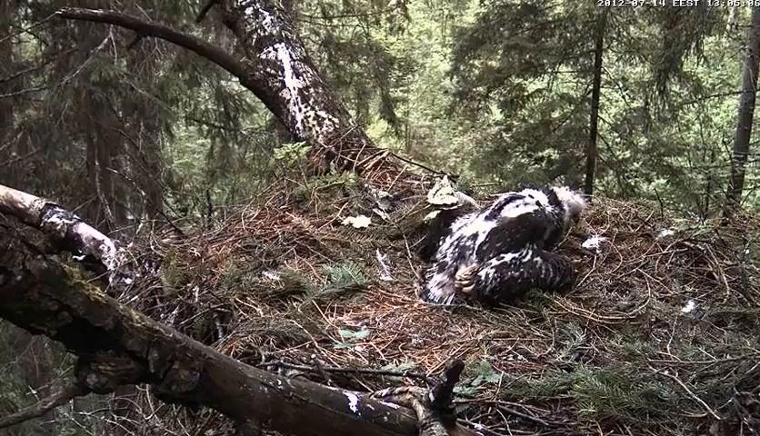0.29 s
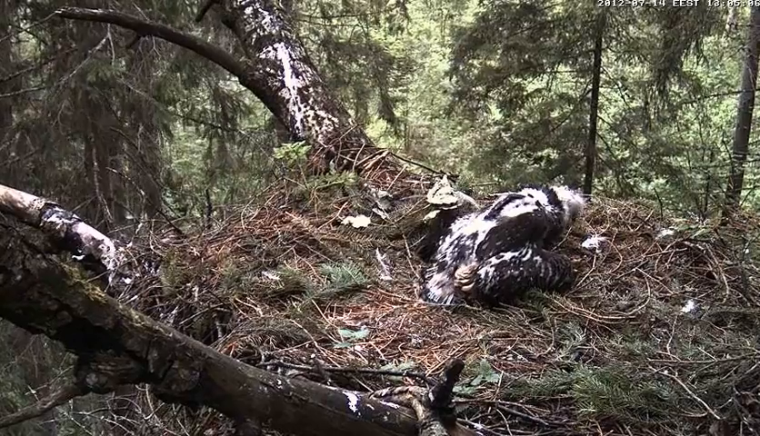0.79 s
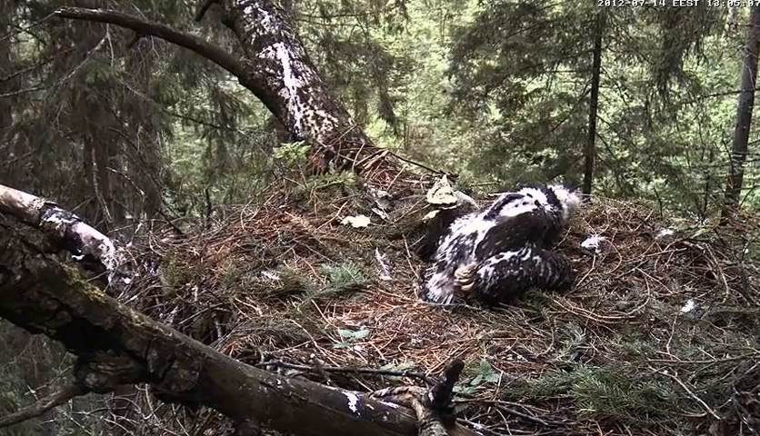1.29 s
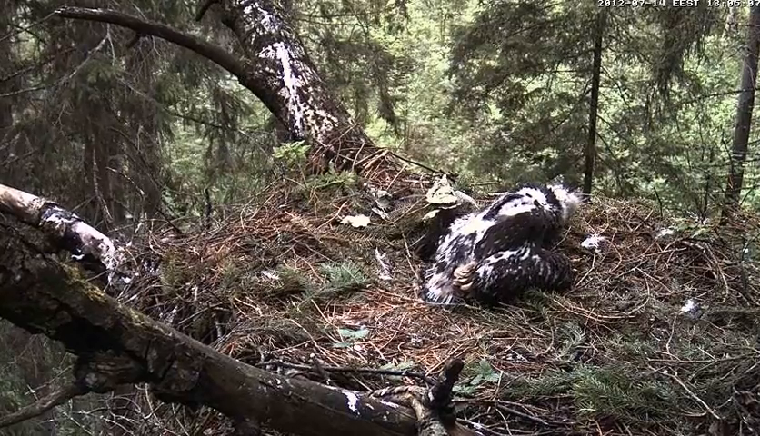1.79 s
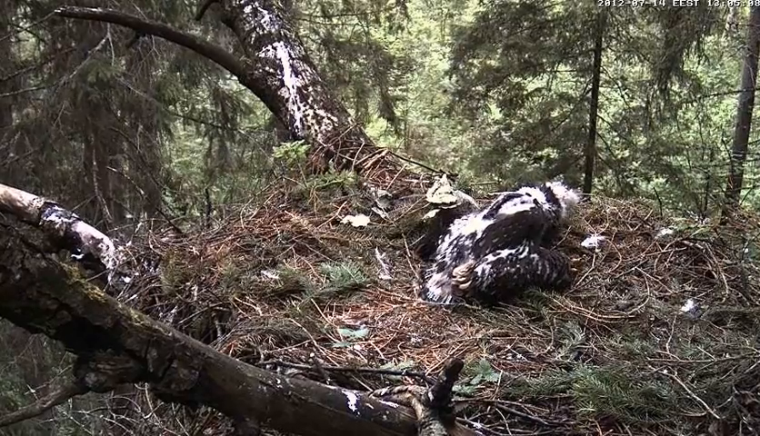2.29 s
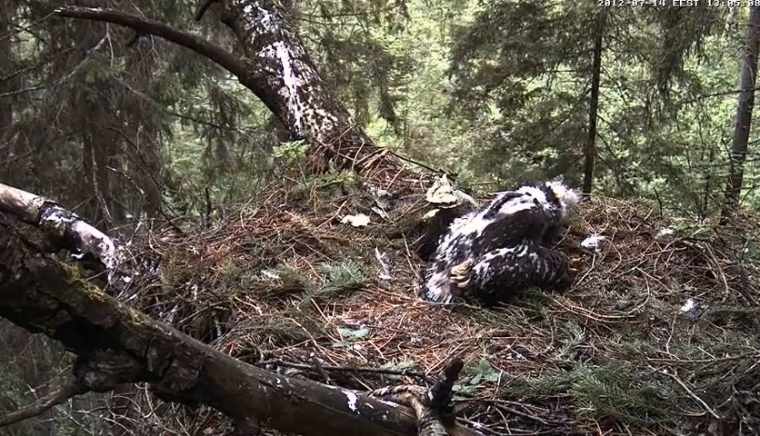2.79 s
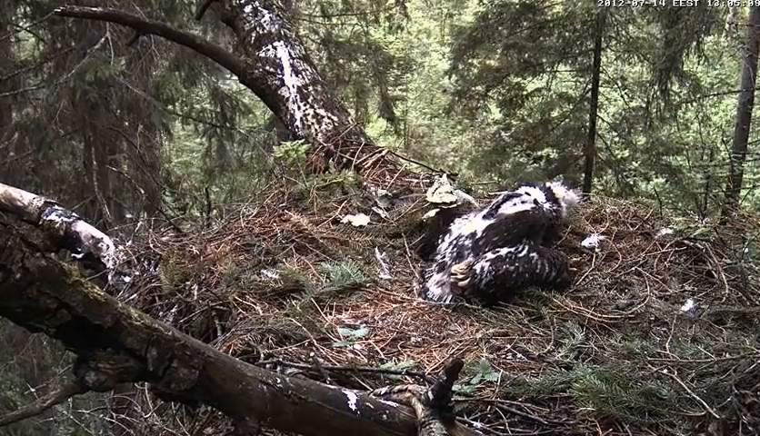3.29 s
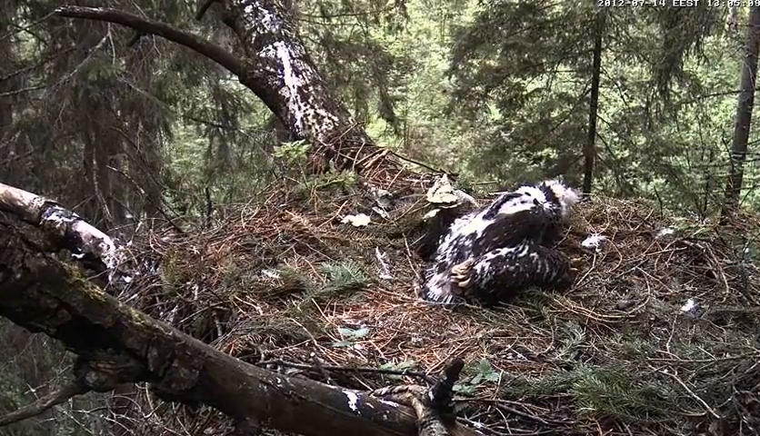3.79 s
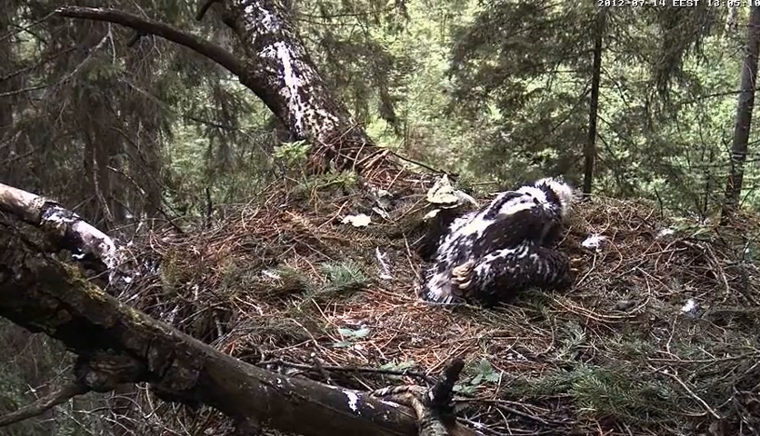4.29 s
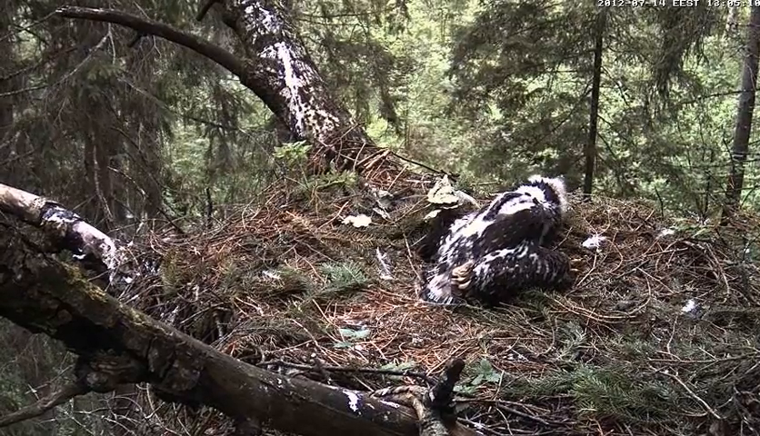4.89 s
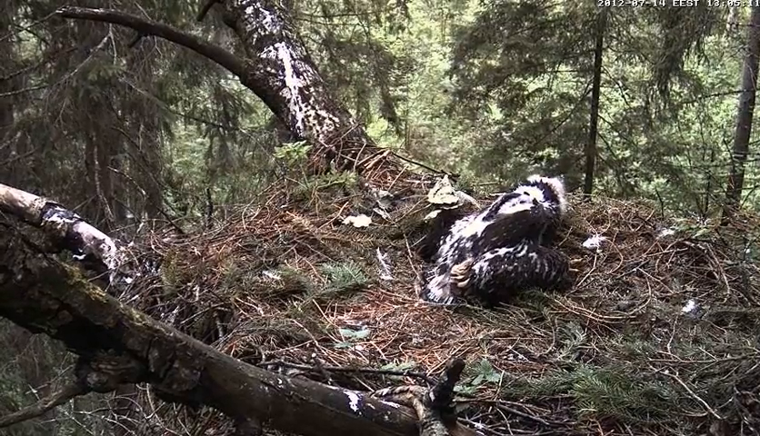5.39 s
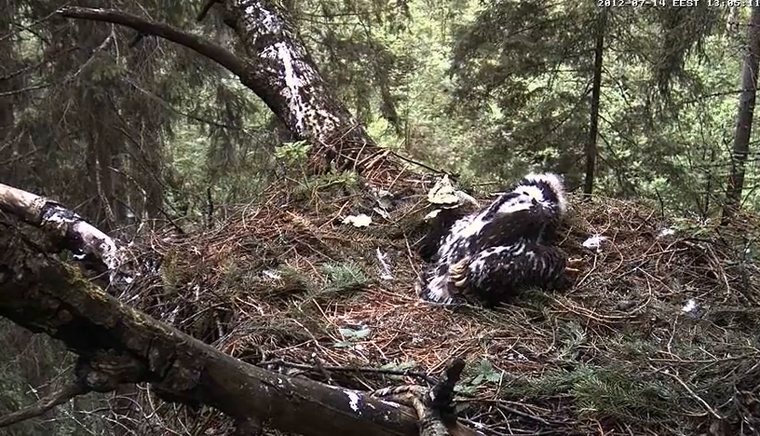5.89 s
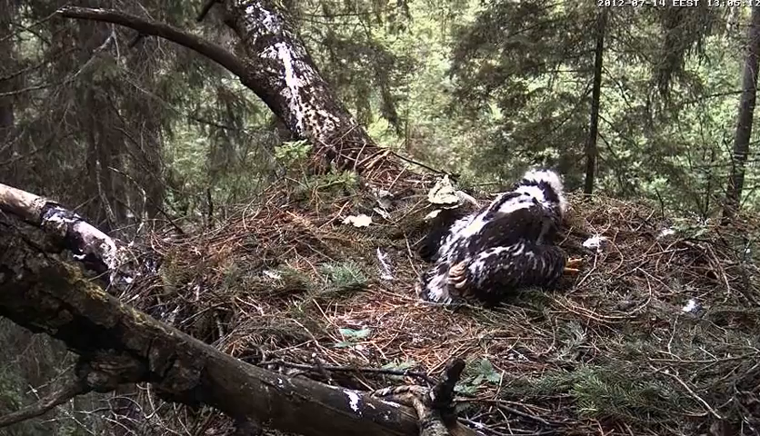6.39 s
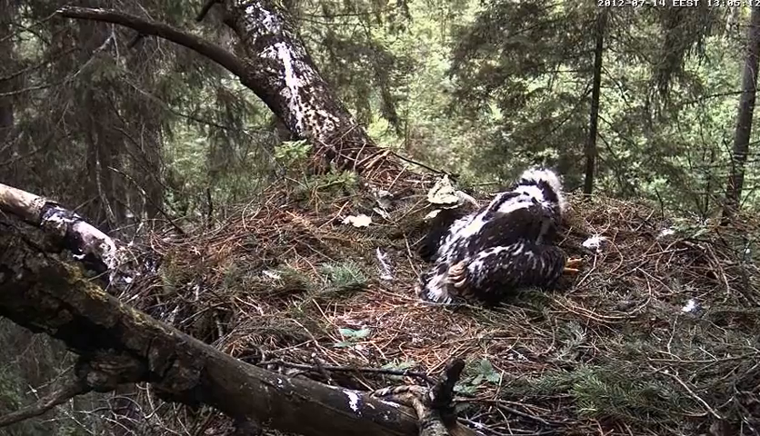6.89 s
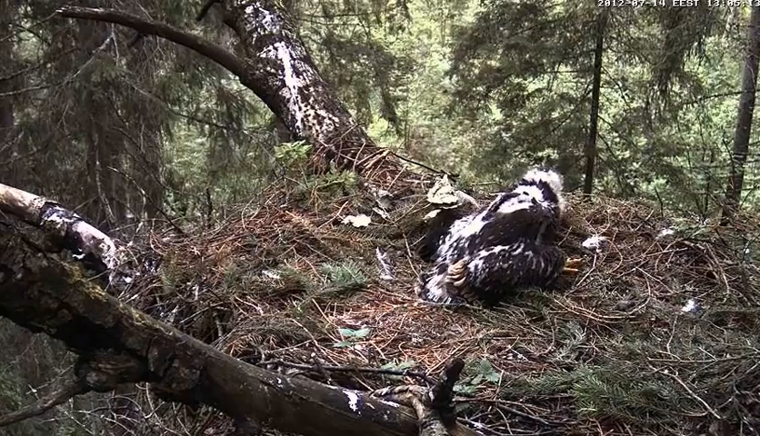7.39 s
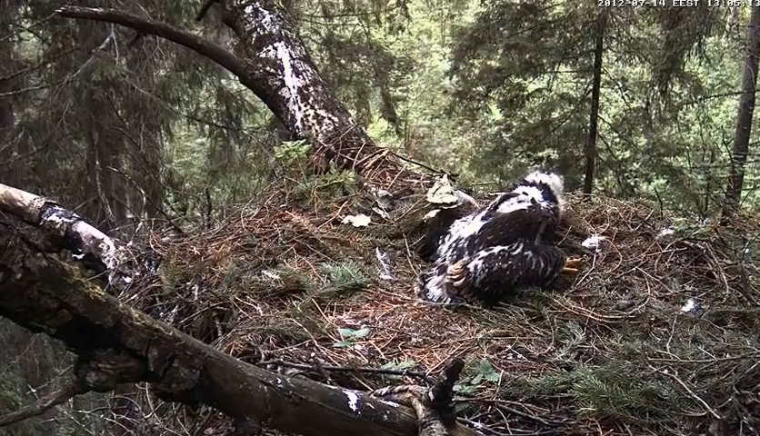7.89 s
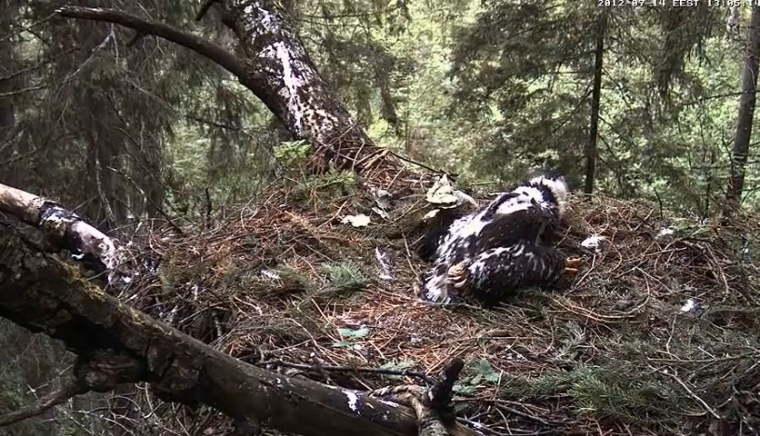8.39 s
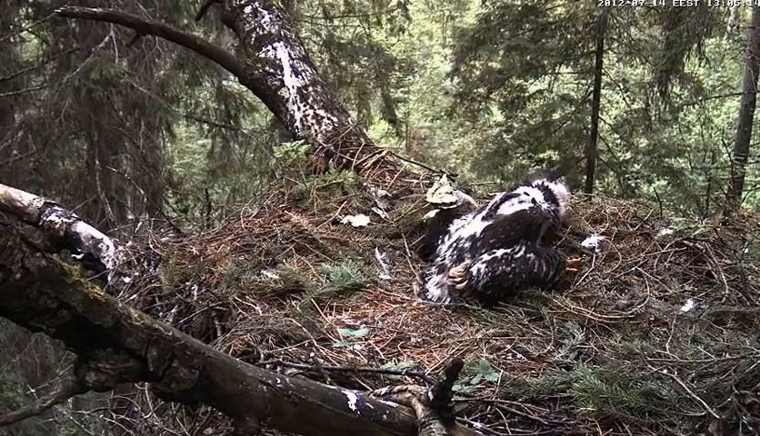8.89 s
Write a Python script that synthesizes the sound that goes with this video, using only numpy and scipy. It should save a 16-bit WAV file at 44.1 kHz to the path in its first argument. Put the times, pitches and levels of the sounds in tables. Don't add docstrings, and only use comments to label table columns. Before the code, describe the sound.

In a forest nest, one chick repeats a clipped, slightly hoarse two-step whistle, high then suddenly low, at an even insistent pace. Small puffs of breath and very faint rising squeaks fill some gaps. A quiet, dull hiss of wind swells and sinks behind, and each cry leaves a faint tail among the trees. The close nest microphone is lo-fi, with a gritty edge on peaks.

```python
import sys
import numpy as np
from scipy import signal
from scipy.fft import rfft, irfft, next_fast_len
from scipy.io import wavfile
from scipy.ndimage import uniform_filter1d

SR = 44100
rng = np.random.default_rng(int(sys.argv[2]) if len(sys.argv) > 2 else 0)


def pcm_store(signal):
    levels = np.round(np.clip(np.atleast_2d(signal), -1, 1) * 32767)
    wavfile.write(sys.argv[1], SR, levels.astype(np.int16).T)


def gain_from_db(level_db):
    decades = np.asarray(level_db, float) / 20
    return 10 ** decades


N = 401310

# (voice onset t/s, swell/s, start f/Hz, end f/Hz, level/dB)
HIGH_NOTES = [(.464, 0.011, 2728, 2579, -25.5), (1.110, 0.026, 2773, 2590, -25.5),
              (1.775, .008, 2713, 2570, -30), (2.402, .022, 2711, 2576, -28),
              (3.143, 0.043, 2792, 2617, -25.5), (3.794, 0.0053, 2704, 2582, -28.5),
              (4.441, 0.012, 2740, 2620, -25.5), (5.099, 0.014, 3034, 2928, -27.5),
              (5.803, 0.015, 3050, 2818, -26), (6.485, 0.014, 2782, 2558, -24),
              (7.137, 0.021, 2830, 2548, -24), (7.815, 0.043, 2830, 2454, -24),
              (8.452, 0.084, 2967, 2614, -22), (9.095, 0.008, 2900, 2674, -24.5)]
# (against high note/dB, against low note/dB, rush of air before the voice/dB)
BREATHINESS = [(-13, -21, -45), (-10.5, -25.5, -48), (-6.5, -26, -59.5), (-10, -24.5, -46), (-12, -26, -53),
               (-7.5, -30.5, -47.5), (-11.5, -20, -47.5), (-23.5, -14, -67), (-19.5, -18, -53.5),
               (-15, -24.5, -43), (-16.5, -23.5, -45), (-17, -31.5, -50), (-19.5, -16.5, -50),
               (-6.5, -19, -47.5)]
GLIDE_S = .032
CATCH_S = 0.0046
RELEASE_S = .018


def rms_one(x):
    return x / np.sqrt(np.mean(x ** 2) + 1e-20)


def colour(x, points):
    hz, db = np.transpose(points)
    size = next_fast_len(N + 4096)
    grid = np.log(np.arange(size // 2 + 1) * SR / size + 1)
    gain = gain_from_db(np.interp(grid, np.log(hz), db))
    padded = np.pad(x, 2048, "reflect")
    return irfft(rfft(padded, size) * gain, size)[2048:2048 + N]


def drift(rate_hz):
    low = signal.butter(2, rate_hz, fs=SR, output="sos")
    return rms_one(signal.sosfilt(low, rng.standard_normal(N + SR))[SR:])


def breath(modes):
    air, out = rng.standard_normal(N), 0
    for k, (hz, width, db) in enumerate(modes):
        r = np.exp(-np.pi * width / SR)
        ring = [1, -2 * r * np.cos(2 * np.pi * hz / SR), r * r]
        once = signal.lfilter([1, 0, -1], ring, air)
        twice = signal.lfilter([1, 0, -1], ring, once)
        out = out + (-1) ** k * gain_from_db(db) * rms_one(twice)
    return rms_one(out)


def hump(start, length):
    at = np.arange(int(start * SR), int((start + length) * SR))
    return at, np.sin(np.linspace(0, np.pi, len(at)))


def wind(patchy_db=0.99):
    # (t/s, level/dB)
    gusts = [
        (0.0, -46.5),
        (1.77, -47.5),
        (1.929, -49.5),
        (4.328, -47.5),
        (6.41, -47.5),
        (6.82, -50),
        (8.72, -50),
        (9.1, -49),
    ]
    # (f/Hz, level per Hz/dB)
    hiss = [(82, -74), (140, -50.5), (207, -23), (297, -8.5), (341, -5), (376, -2.5), (483, -0.5),
            (620, -4.5), (879, -14.5), (1230, -13.5), (1450, -10), (1670, -12.5), (1860, -9.5),
            (2360, -15.5), (3490, -21.5), (3900, -33.5), (5070, -65), (8580, -120)]
    s, db = np.transpose(gusts)
    level = gain_from_db(np.interp(np.arange(N) / SR, s, db) + patchy_db * drift(4.7))
    return level * rms_one(colour(rng.standard_normal(N), hiss))


def squeaks():
    out = np.zeros(N)
    # (t/s, length/s, start f/Hz, end f/Hz, level/dB)
    whistles = [
        (.275, 0.022, 3600, 3690, -62.5),
        (3.57, 0.054, 3300, 3510, -58.5),
        (4.225, 0.067, 3120, 3400, -57),
        (5.605, 0.018, 3400, 3900, -60.5),
        (7.655, 0.027, 3480, 3600, -66),
        (8.905, 0.028, 3620, 3730, -66),
    ]
    for s, length, from_hz, to_hz, db in whistles:
        at, shape = hump(s, length)
        phase = 2 * np.pi * np.cumsum(np.linspace(from_hz, to_hz, len(at))) / SR
        out[at] = gain_from_db(db) * np.sqrt(2 * np.abs(shape)) * np.sin(phase)
    return out


def glide_start(onset):
    # (voice onset t/s, murmur/s)
    murmurs = [
        (1.775, .024),
        (3.143, 0.013),
    ]
    murmur = [length for s, length in murmurs if abs(s - onset) < .02]
    return onset - GLIDE_S - max(murmur + [CATCH_S])


def rushes(length=0.043):
    # (f/Hz, width/Hz, level/dB)
    rush_modes = [(2100, 500, -1.5), (2900, 530, 3.5), (3470, 450, -8.5)]
    gain = np.zeros(N + SR)
    for high, (_, _, rush_db) in zip(HIGH_NOTES, BREATHINESS):
        at, shape = hump(glide_start(high[0]), length)
        gain[at] = gain_from_db(rush_db) * shape
    return gain[:N] * breath(rush_modes)


def contour(now, high, low, rush_db):
    # (t/s, drop/Hz, louder/dB)
    slips = [
        (5.1367, 149.9, 3.5),
        (5.843, 86.2, 4.5),
    ]
    glide_from_hz, glide_under_rush_db, glide_end_db = 3900, 11.5, -47
    catch_hz, catch_follows, catch_db = 3115, 0.51, -38.5
    quick_settle_hz, settle_s_per_hz, murmur_slows = 2679, 5e-5, .25
    high_fade_db, low_fade_db = 2, 1.5
    easy_break_hz, crack_db_per_hz = 2620, 0.14
    entry_db, recover_s = 3, 0.022
    slip_s, swoop_s = 0.0044, 0.0011
    onset, swell, high_from, high_to, high_db = high
    jump, hold, low_from, low_to, low_db = low
    along = (now - onset) / (jump - onset)
    slipped = [(np.clip((now - s) / slip_s + .5, 0, 1), hz, db) for s, hz, db in slips if onset < s < jump]
    marks = [now[0], now[0] + GLIDE_S, now[0] + GLIDE_S + .002, onset]

    settle = np.clip(settle_s_per_hz * (high_from - quick_settle_hz), .001, .008)
    settle = settle + murmur_slows * (onset - marks[1])
    caught_hz = catch_hz + catch_follows * (high_from - quick_settle_hz)
    above = np.interp(now, marks[:2], [glide_from_hz - high_from, caught_hz - high_from])
    above = above * np.exp(-np.maximum(now - marks[1], 0) / settle)
    upper_hz = high_from + (high_to - high_from) * along + above
    upper_hz = upper_hz - sum(hz * x for x, hz, db in slipped)
    opening = gain_from_db(np.interp(now, marks, [rush_db - glide_under_rush_db, glide_end_db, -41, catch_db]))
    swollen = np.clip((now - onset) / swell, 0, 1)
    held = gain_from_db(high_db + high_fade_db * (1 - 2 * along))
    upper_db = 20 * np.log10(opening * (1 - swollen) + swollen * held)
    upper_db = upper_db + sum(db * x for x, hz, db in slipped)

    strain_hz = max(high_to - sum(hz for x, hz, db in slipped) - easy_break_hz, 0)
    weak_db = entry_db + crack_db_per_hz * strain_hz
    weak_db = weak_db * np.clip(1 - (now - jump) / recover_s, 0, 1) ** 0.76
    low_along = (now - jump) / hold
    lower_hz = low_from + (low_to - low_from) * low_along
    release_db = 25.5 * np.maximum((now - jump - hold) / RELEASE_S, 0) ** 1.2
    lower_db = low_db + low_fade_db * (1 - 2 * low_along) - release_db
    fall = np.clip((now - jump) / swoop_s + .5, 0, 1)
    pitch = upper_hz + fall * (lower_hz - upper_hz)
    return pitch, np.where(now < jump, upper_db, lower_db), weak_db * (now >= jump)


def calls(flutter_db=1.14, faint_db=-2.5, waver_hz=7.6, faint_hz=35., stall_s=0.0018):
    # (break t/s, hold/s, start f/Hz, end f/Hz, level/dB)
    low_notes = [(.52, .032, 2243, 1995, -23.5), (1.163, .041, 2276, 2050, -22.5),
                 (1.81, .041, 2298, 2034, -21.5), (2.456, .038, 2303, 2074, -23),
                 (3.205, .039, 2297, 2024, -23.5), (3.853, .027, 2241, 2056, -21),
                 (4.489, .051, 2320, 2025, -23.5), (5.155, .053, 2340, 2060, -28),
                 (5.858, 0.043, 2347, 2058, -25.5), (6.544, .038, 2266, 2020, -24.5),
                 (7.193, .039, 2245, 2022, -24), (7.895, 0.024, 2138, 1952, -24.5),
                 (8.518, .047, 2345, 2010, -27), (9.145, .04, 2260, 2050, -26)]
    # (f/Hz, width/Hz, level/dB)
    windpipe_high = [(1110, 150, -12), (1577, 350, -6.5), (2050, 200, 0), (2276, 81, 6), (2940, 490, -3)]
    # (f/Hz, width/Hz, level/dB)
    windpipe_low = [(1102, 95, -10), (1750, 1200, -5), (2830, 510, 4), (3170, 860, -7.5)]
    near_break_db, near_break_s = 4.5, 0.013
    crack_burst_share, crack_burst_s = 0.51, 0.003
    air_weak_share = .1
    t = np.arange(N) / SR
    pitch, stall = np.full(N, 3000.), np.ones(N)
    level, hoarse_high, hoarse_low = np.zeros((3, N))
    for high, low, (high_db, low_db, rush_db) in zip(HIGH_NOTES, low_notes, BREATHINESS):
        first, last = glide_start(high[0]), low[0] + low[1] + RELEASE_S
        on = slice(int(first * SR), int(last * SR))
        now = t[on]
        after = now - low[0]
        pitch[on], db, weak_db = contour(now, high, low, rush_db)
        level[on] = gain_from_db(db) * np.clip(np.minimum(now - first, last - now) / 0.0048, 0, 1)
        fallen = np.interp(after, [-.004, 0], [0, 1])
        near_db = near_break_db * np.exp(-np.abs(after) / near_break_s)
        burst_db = crack_burst_share * weak_db.max(initial=0) * np.exp(-np.abs(after) / crack_burst_s)
        hoarse_high[on] = gain_from_db(high_db + near_db) * (1 - fallen)
        hoarse_low[on] = gain_from_db(low_db + burst_db - air_weak_share * weak_db) * fallen
        stall[on] = gain_from_db(-weak_db) * (1 - .85 * np.exp(-(after / stall_s) ** 2))
    faint = uniform_filter1d(1. * (level < gain_from_db(-44)), size=200)
    wavering = pitch + (waver_hz + faint_hz * faint) * drift(150)
    phase = 2 * np.pi * np.cumsum(wavering) / SR
    flutter = gain_from_db((flutter_db + faint_db * faint) * drift(120) - 7 * faint)
    tone = np.sqrt(2) * stall * flutter * np.sin(phase)
    air = hoarse_high * breath(windpipe_high) + hoarse_low * breath(windpipe_low)
    return level * (tone + gain_from_db(0.97 * drift(60)) * air)


def forest(x):
    echo_s, echo_db = 0.1, -41
    tail_db, tail_t60_s = -19.5, 0.47
    # (f/Hz, level/dB)
    foliage = [(1500, -3.5), (2100, -1.5), (2400, -7), (2650, 4), (3300, -7.5)]
    t = np.arange(SR // 2) / SR
    scatter = rng.standard_normal((2, len(t)))
    echo = scatter[0] * np.exp(-((t - echo_s) / 0.0087) ** 2)
    tail = scatter[1] * gain_from_db(-60 * t / tail_t60_s) * np.minimum(t / 0.013, 1)
    reply = gain_from_db(echo_db) * rms_one(echo) + gain_from_db(tail_db) * rms_one(tail)
    return colour(signal.fftconvolve(x, reply / np.sqrt(len(t)))[:N], foliage)


def gasps():
    # (t/s, length/s, level/dB)
    puffs = [(0.851, 0.015, -44), (1.49, 0.064, -52), (2.135, 0.042, -53.5), (2.882, 0.029, -51.5),
             (3.535, 0.018, -56), (4.172, 0.021, -48.5), (5.542, 0.028, -49), (6.14, 0.0087, -61),
             (6.86, 0.029, -50.5), (7.499, 0.019, -68), (8.198, 0.019, -49.5), (8.821, 0.018, -48)]
    # (f/Hz, width/Hz, level/dB)
    bill_modes = [(1473, 400, -1.5), (2050, 560, -2.5), (2740, 200, -8)]
    gain = np.zeros(N)
    for s, length, db in puffs:
        at, shape = hump(s, length)
        gain[at] = gain_from_db(db) * np.sqrt(np.abs(shape))
    return gain * breath(bill_modes)


def scene():
    chick = calls() + rushes() + squeaks()
    return (chick + forest(chick) + gasps() + wind())[None]


def low_pass(x):
    return signal.sosfilt(signal.butter(12, 12850, fs=SR, output="sos"), x)


def record(dry):
    # (f/Hz, level/dB)
    band_edge = [(3900, 0), (4050, -3), (4200, -80)]
    # (f/Hz, level/dB)
    image = [(3900, -56), (4000, -0.5), (4580, -15.5), (5000, -39), (5300, -62.5), (6000, -83)]
    # (f/Hz, level/dB)
    bend = [(3400, -48.5), (4300, -18), (6000, -4.5), (8000, 2), (8900, -3.5), (9500, -3.5), (10000, -33),
            (11000, -1.5), (12800, -32.5)]
    # (f/Hz, level/dB)
    fifth_colour = [(9500, -45), (10300, -6), (12800, -2)]
    # (f/Hz, level/dB)
    smear_colour = [(5300, -49.5), (5800, 1), (7500, 8), (9000, -12), (9400, -57.5)]
    # (f/Hz, level/dB)
    shimmer_colour = [(5500, -39), (7500, -4.5), (10000, -1), (12500, -5), (13000, -42.5)]
    limit, camera_hz, smear_s = .13, 8000, .055
    square_db, cube_db, fifth_db, smear_db, shimmer_db = 0, 38, 67, -30, -101
    x = colour(dry[0], band_edge)
    x = x / (1 + (np.abs(signal.hilbert(x)) / limit) ** 6) ** (1 / 6)
    mirror = 2 * x * np.cos(2 * np.pi * camera_hz * np.arange(N) / SR)
    x = x + colour(mirror, image)
    third = colour(gain_from_db(square_db) * x * np.abs(x) + gain_from_db(cube_db) * x ** 3, bend)
    fifth = colour(gain_from_db(fifth_db) * x ** 5, fifth_colour)
    frame = np.hanning(int(2 * smear_s * SR))
    spread = np.sqrt(np.abs(signal.fftconvolve(third ** 2, frame / frame.sum(), "same")))
    spread = np.roll(spread, int(.012 * SR))
    smear = gain_from_db(smear_db) * spread * rms_one(colour(rng.standard_normal(N), smear_colour))
    shimmer = rms_one(colour(rng.standard_normal(N), shimmer_colour))
    shimmer = gain_from_db(shimmer_db + 2.5 * drift(8)) * shimmer
    return low_pass((x + third + fifth + smear + shimmer)[None])


dry = scene()
out = record(dry)
pcm_store(out)
```